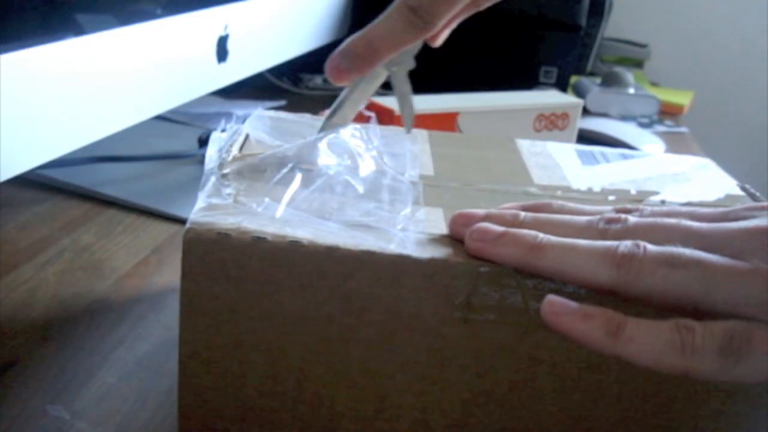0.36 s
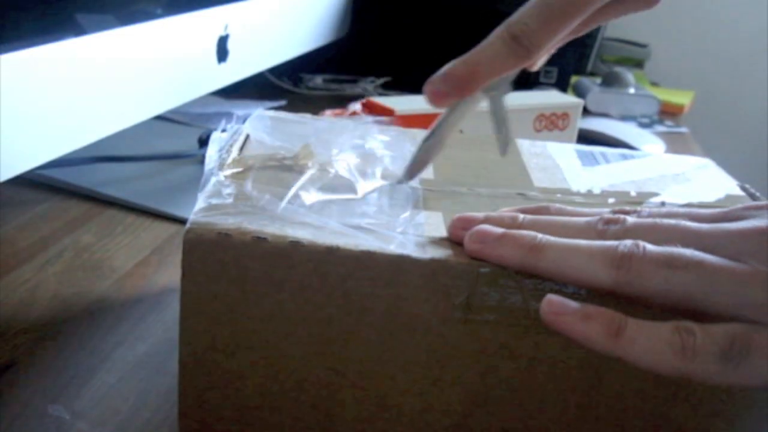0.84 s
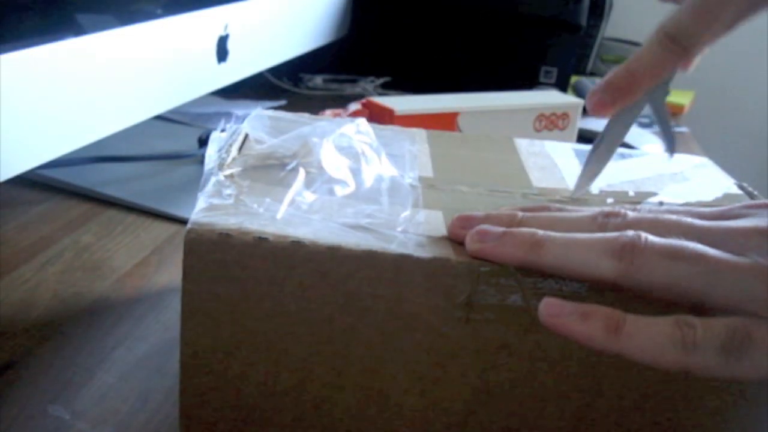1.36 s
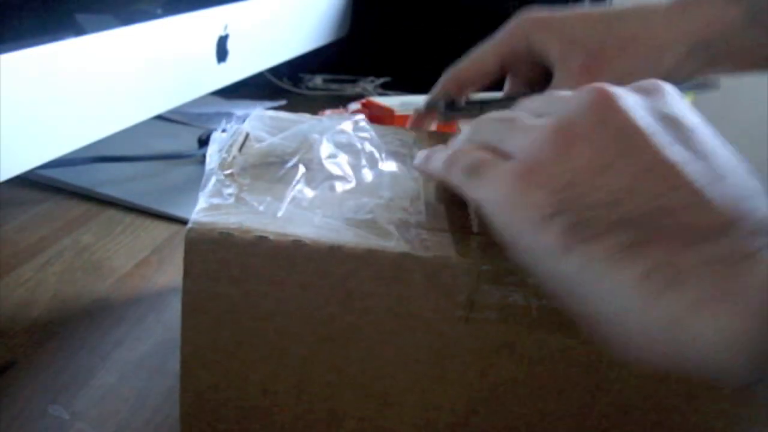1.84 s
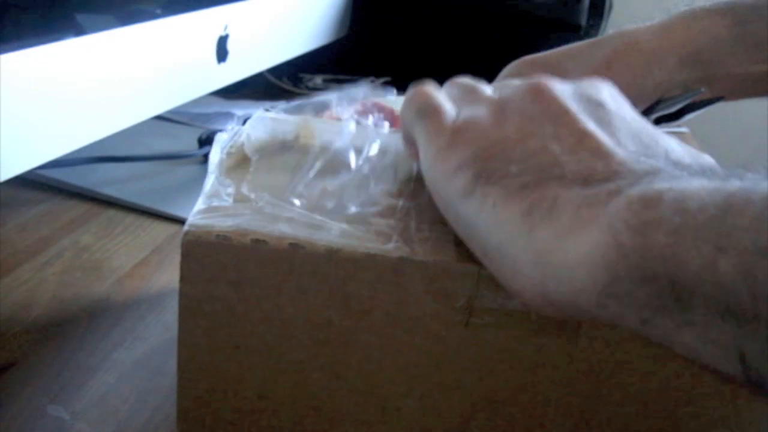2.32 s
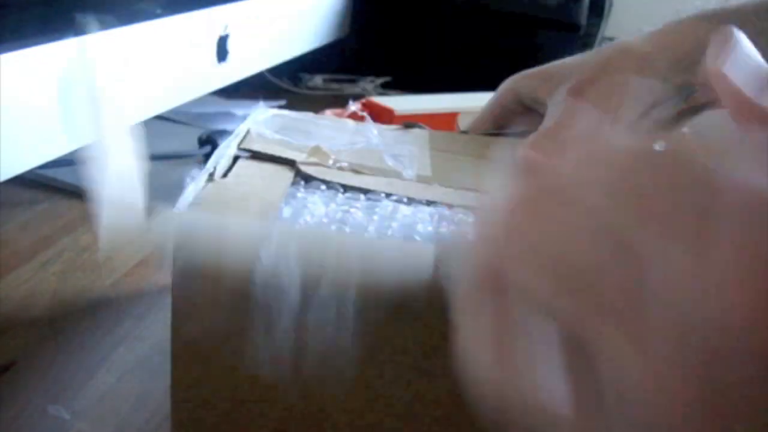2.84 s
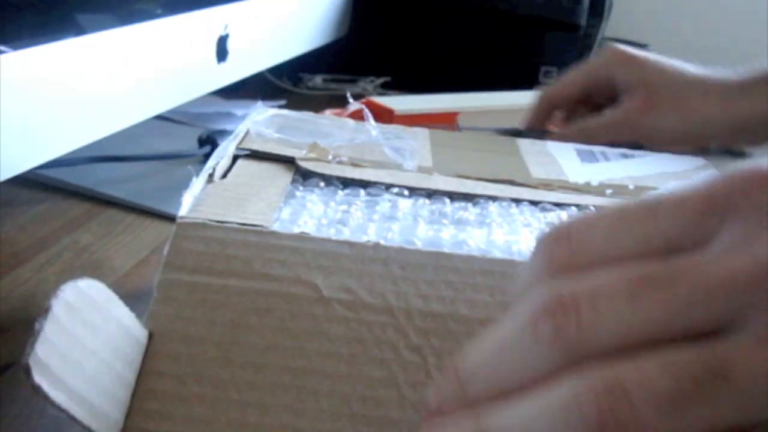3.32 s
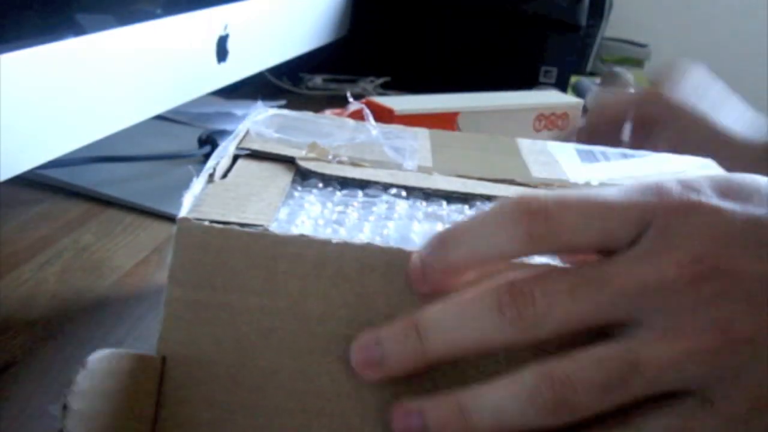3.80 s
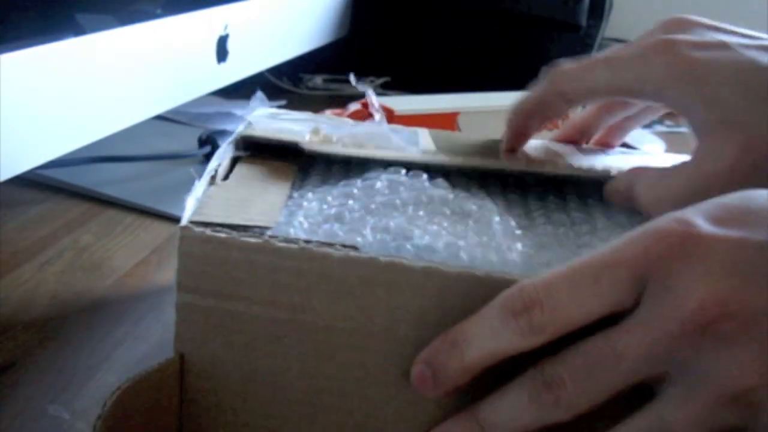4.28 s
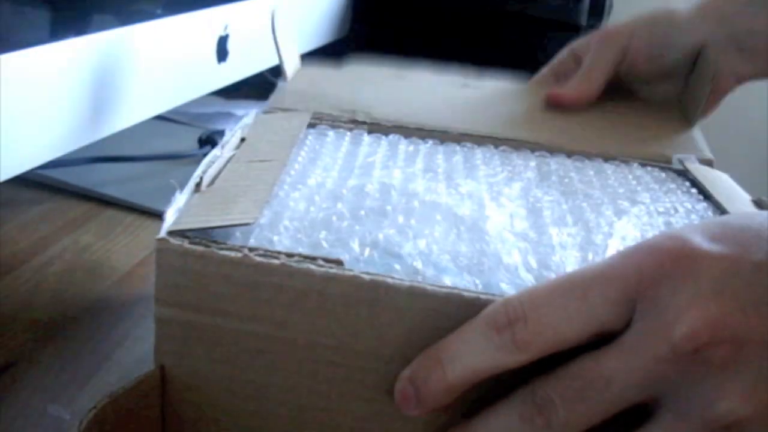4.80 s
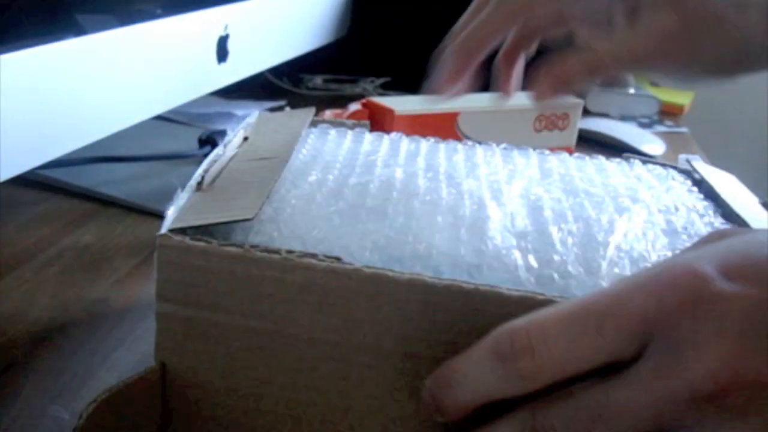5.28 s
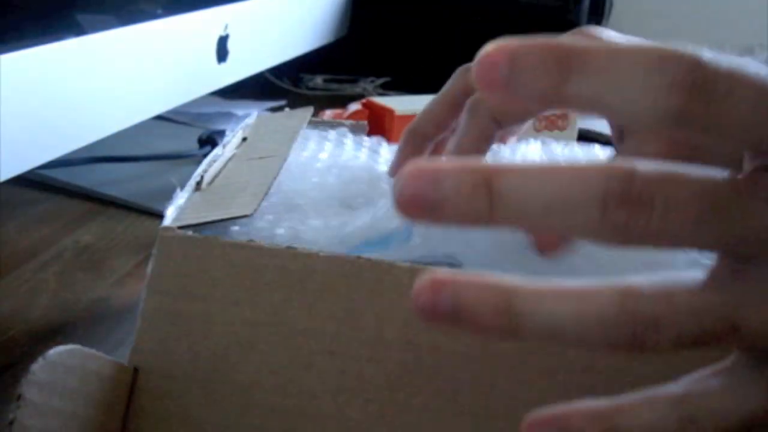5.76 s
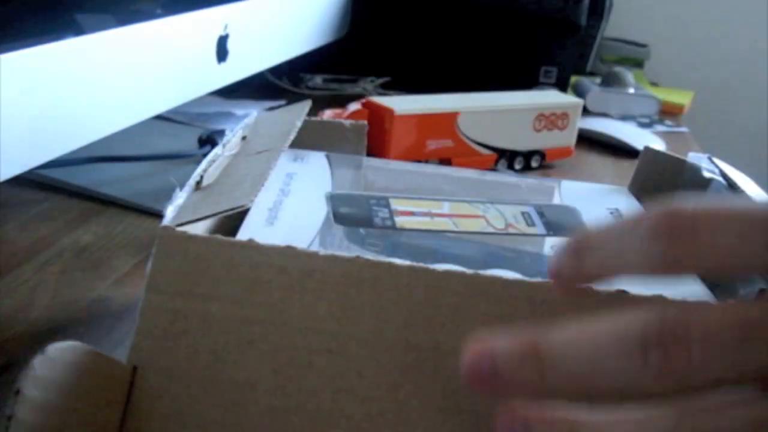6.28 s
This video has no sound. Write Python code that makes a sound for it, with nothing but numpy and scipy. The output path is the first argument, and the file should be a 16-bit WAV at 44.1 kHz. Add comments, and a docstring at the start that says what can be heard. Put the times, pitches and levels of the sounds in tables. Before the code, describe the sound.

Very close to a small mono microphone in a small dry room, a blade cuts tape on a cardboard box with jerky scrapes and sharp snaps. After a brief near-silence, hands tear and fold the flaps with crackles, hollow knocks, loud board pops and low desk thumps. Finally bubble wrap slides out with softer, smoother plastic rustling over faint steady hiss.

```python
"""Opening a taped cardboard box

A blade slits the tape close to a small mono microphone, hands fold the flaps back, bubble wrap is lifted out.
Slips (random clicks) and blows (a push and dying noise) drive resonances of box, flaps, tape and film;
bent panels sing as wavering tones, board pops as single pulses, the desk thumps.
A small room of feedback delays answers, over steady shaped hiss and a faint even tick inside the camera.
"""
import sys
import numpy as np
from scipy import signal
from scipy.fft import rfft, irfft, next_fast_len
from scipy.io import wavfile

SR = 44100
rng = np.random.default_rng(int(sys.argv[2]) if len(sys.argv) > 2 else 0)


def file_out(sig):
    """Save sig as 16-bit WAV at sys.argv[1]."""
    # one column per channel
    cols = np.atleast_2d(sig).T
    # limit, then scale
    lim = np.clip(cols, -1, 1)
    pcm = np.round(lim * 32767).astype(np.int16)
    wavfile.write(sys.argv[1], SR, pcm)


def boost_factor(decibels):
    """Convert a level in decibels to a linear amplitude factor."""
    exponent = np.asarray(decibels, float) / 20
    return 10 ** exponent


N = 292543


def rms_one(x):
    """Scale to unit rms."""
    return x / np.sqrt(np.mean(x ** 2) + 1e-20)


def in_time(rows):
    """Columns of a curve, sample by sample."""
    s, *columns = np.transpose(rows)
    return [np.interp(np.arange(N) / SR, s, c) for c in columns]


def drift(rate_hz):
    """Slow chance of rms 1: noise through a double one-pole low-pass."""
    r = np.exp(-2 * np.pi * rate_hz / SR)
    noise = rng.standard_normal(N + SR)
    return rms_one(signal.lfilter([1], [1, -2 * r, r * r], noise)[SR:])


WANDER_HZ = 12.4


def resonate(x, modes, wander_db=0):
    """Parallel modes of alternating sign, their drives wandering with the grip; white noise keeps its rms."""
    click = np.arange(SR) == 0
    out, answer = 0, 0
    for k, (hz, width_hz, level_db) in enumerate(modes):
        r = np.exp(-np.pi * width_hz / SR)
        zeros = (-1) ** k * boost_factor(level_db) * (1 - r * r) * np.array([1, 0, -1])
        poles = [1, -2 * r * np.cos(2 * np.pi * hz / SR), r * r]
        grip = rms_one(boost_factor(wander_db * drift(WANDER_HZ))) if np.any(wander_db) else 1
        out = out + signal.lfilter(zeros, poles, x * grip + 1e-18)
        answer = answer + signal.lfilter(zeros, poles, click + 1e-18)
    return out / np.sqrt(np.sum(answer ** 2))


def slips(per_s, spread_db, clump_db):
    """Stick-slip: random clicks of uneven size that come in clumps; rms 1."""
    sizes = boost_factor(spread_db * np.minimum(rng.exponential(1, N), 4)) * rng.choice([-1, 1], N)
    happens = rng.random(N) < per_s / SR
    return rms_one(sizes * happens * boost_factor(clump_db))


def rattles(s, levels_db, t60s, first_db, rattle_db=0):
    """Each blow is a one-sample push, then noise that dies away; t60 is held to 5 ms or more."""
    out, t = np.zeros(N), np.arange(SR // 2) / SR
    for at, level_db, t60 in zip(np.round(s * SR).astype(int), levels_db, t60s):
        shake = rng.standard_normal(len(t)) * boost_factor(-60 * t / np.clip(t60, .005, 1))
        shake[0] = boost_factor(first_db)
        out[at:at + len(t)] += boost_factor(level_db + rattle_db) * shake[:N - at]
    return out


GRIP_DB_PER_S, LET_GO_DB_PER_S = 6008, 598  # abrupt start, gentler stop


def rubs(rows):
    """Power of two bodies: each rub grips, slides from its first level to its last and lets go."""
    t, first, second = np.arange(N) / SR, np.zeros(N), np.zeros(N)
    for s, length, start_db, end_db, over_db in rows:
        end = s + max(length, 1 / 1000)
        span = slice(max(int(s * SR) - SR // 20, 0), int(end * SR) + SR // 4)
        level_db = np.interp(t[span], [s, end], [start_db, end_db])
        level_db -= GRIP_DB_PER_S * np.maximum(s - t[span], 0)
        level_db -= LET_GO_DB_PER_S * np.maximum(t[span] - end, 0)
        first[span] += boost_factor(2 * level_db)
        second[span] += boost_factor(2 * (level_db + over_db))
    return first, second


# resonances of each body: f/Hz, width/Hz, relative level/dB
BOX_MODES = [(135, 40, -13), (185, 30, -9), (285, 50, -4), (335, 40, -3), (385, 28, 1), (470, 50, -4)]
FLAP_MODES = [(578, 32, -1), (660, 40, -6), (711, 25, -2), (778, 30, 1), (865, 45, -3)]
CREASE_MODES = [(975, 105, -1.4), (1105, 73, 1.2), (1189, 88, -0.64), (1327, 50, 2), (1480, 60, -0.9)]
RIB_MODES = [(1626, 93, 1.5), (1832, 98, 0), (2028, 75, -0.5), (2245, 230, -4), (2665, 200, -4.5)]
TAPE_MODES = [(2285, 270, 3.2), (2388, 117, 9.4), (2580, 1050, 2.25), (3260, 210, 8.85), (3545, 820, 1.4)]
FILM_MODES = [(4490, 910, -5), (5455, 884, 0.5), (6100, 2440, -3.5), (7650, 890, -3), (10260, 800, -1)]
BLADE_MODES = [(2480, 140, 0)]
# stick-slip of box, flaps, creases, ribs, tape, film: rate/(1/s), size spread/dB, mode wander at 2 dB jerk/dB
BODY_SLIPS = [(800, 2.5, 2.4), (1100, 3.5, 2.4), (1800, 3, 2.1), (2600, 2.5, 1.6), (3000, 3, 2),
              (7000, 3.3, 2.6)]
# jerkiness of the hands, smooth once the wrap slides out: t/s, clumping/dB
HAND_JERK = [(0, 2), (1.9, 2), (5.5, 2), (5.65, .8), (6.63, .8)]
# blade singing along the seam: t/s, level/dB
BLADE_RASP = [(.2, -75), (.23, -34), (.275, -34), (.35, -37), (.38, -78.5)]
# blade and fingers on cardboard: t/s, length/s, box start level/dB, box end level/dB, flaps over box/dB
CARDBOARD_RUBS = [(0, 0.0036, -28, -39.5, -7), (.035, 0.041, -44, -26.5, -6.5),
                  (.131, 0.059, -30, -49, -18), (.207, 0.19, -36, -38, -5), (.41, 0.12, -45.5, -55.5, -8),
                  (.525, 0.097, -35.5, -36, -2.5), (.667, 0.064, -28, -34, -3.5), (.75, 0.079, -48, -58, 0),
                  (.824, 0.11, -43.5, -42, -1), (.916, 0.06, -41.5, -27.5, -3.5),
                  (.978, 0.089, -37.5, -27, -11), (1.064, 0.14, -38.5, -57, -3.5),
                  (1.19, 0.11, -45.5, -47, -6), (1.29, 0.026, -42.5, -28, -17),
                  (1.326, 0.22, -27.5, -63.5, -4.5), (1.58, 0.11, -55.5, -54, -18),
                  (1.71, 0.21, -57, -64, -8.5), (1.9, 0.044, -61, -43, -9), (1.955, 0.12, -39, -57, -9),
                  (2.083, 0.09, -44, -38, -5), (2.145, 0.13, -46, -47, -6), (2.256, 0.041, -22, -34, -23),
                  (2.302, 0.1, -43, -35.5, -9), (2.412, 0.11, -43, -50, 1), (2.51, 0.081, -48, -30, -9),
                  (2.576, 0.021, -22, -30, 0.5), (2.61, 0.15, -30, -57.5, -3.5),
                  (2.79, 0.049, -38, -46.5, -0.5), (2.863, 0.08, -50.5, -36.5, -2.5),
                  (2.963, 0.085, -46.5, -53.5, 2.5), (3.062, 0.083, -40.5, -48, -6.5),
                  (3.14, 0.13, -41.5, -69.5, -3.5), (3.55, 0.027, -56, -65, -3),
                  (3.598, 0.029, -31.5, -38, 5), (3.67, 0.012, -30, -28, 3.5), (3.725, 0.088, -29, -42, -2),
                  (3.816, 0.098, -25.5, -46.5, 3.5), (3.9, 0.15, -48.5, -45.5, 0),
                  (4.07, 0.21, -52.5, -48.5, -6.5), (4.25, 0.14, -50, -44.5, -2.5),
                  (4.372, 0.049, -36, -39, -2), (4.43, 0.12, -40, -38, -1.5), (4.54, 0.14, -44.5, -51, 2),
                  (4.659, 0.083, -31.5, -39, 0.5), (4.765, 0.11, -33, -54.5, 10),
                  (4.93, 0.04, -54, -46, 11), (4.972, .05, -41, -48, 8), (5.026, .02, -36, -40, 4),
                  (5.045, 0.12, -42, -49, 4), (5.158, 0.13, -40.5, -48.5, 7.5), (5.25, 0.18, -38, -48.5, 1),
                  (5.4, 0.077, -44, -45, -4), (5.47, 0.16, -67, -69, -2), (5.63, 0.21, -62, -49, 0.5),
                  (5.86, 0.18, -58.5, -56, 4.5), (6.046, 0.11, -56, -38.5, 1.5), (6.2, 0.056, -53, -61, -4),
                  (6.3, 0.12, -56, -53.5, -3.5), (6.5, 0.098, -61, -53, 5)]
# tape and wrap cut, pulled, crumpled: t/s, length/s, tape start level/dB, tape end level/dB, film over tape/dB
TAPE_FILM_RUBS = [(0, 0.015, -28, -50, -8), (.035, 0.039, -46, -25.5, -2.5), (.131, 0.071, -43, -50.5, -10),
                  (.207, 0.089, -36, -32, 2.5), (.3, 0.12, -38.5, -44, 7), (.405, 0.12, -42, -60.5, 0),
                  (.52, 0.09, -46, -34, 2), (.645, .02, -35.5, -34, -23), (.667, 0.054, -31, -27.5, -2.5),
                  (.72, 0.12, -39, -57.5, 1.5), (.824, 0.065, -44, -35, 0.5), (.916, 0.061, -44, -25.5, 1),
                  (.978, 0.088, -37, -26, -1), (1.07, 0.12, -31, -60.5, -0.5),
                  (1.19, 0.07, -45.5, -49.5, 0), (1.285, 0.027, -57, -31.5, -15),
                  (1.326, 0.24, -24, -71, -1), (1.618, 0.059, -74, -62, 11), (1.712, 0.23, -51.5, -73, -3),
                  (1.955, 0.058, -45, -39, 5.5), (2.012, 0.035, -46, -48.5, 9),
                  (2.084, 0.033, -36.5, -36.5, 2.5), (2.14, 0.11, -36.5, -50.5, -3),
                  (2.256, 0.019, -48, -40, -19), (2.302, 0.13, -38.5, -41, -11),
                  (2.412, 0.12, -42.5, -49, 0), (2.576, 0.021, -26, -24.5, -21),
                  (2.607, 0.11, -34.5, -59, 2), (2.74, 0.038, -58, -43, -9), (2.797, 0.044, -45, -38, -25),
                  (2.863, 0.086, -55, -36.5, -20), (2.963, 0.13, -50.5, -44, 2.5),
                  (3.062, 0.085, -39, -44, -6.5), (3.14, 0.045, -37.5, -51.5, 2.5),
                  (3.176, 0.13, -48, -69, 2), (3.54, 0.014, -53, -54, -4), (3.565, 0.033, -50, -49, -2),
                  (3.596, 0.052, -49, -49, 8), (3.67, 0.015, -40, -70, 7), (3.725, 0.13, -28.5, -47.5, -15),
                  (3.815, 0.019, -31, -44.5, -25), (3.84, 0.22, -43, -41.5, -5.5),
                  (4.066, 0.041, -43, -28.5, -2.5), (4.126, 0.073, -34.5, -47.5, -3),
                  (4.19, 0.048, -45.5, -43.5, -1), (4.25, .11, -35.5, -38.5, 1),
                  (4.37, 0.051, -28.5, -35, 1.5), (4.43, 0.1, -38, -31, -2), (4.54, 0.081, -36, -42.5, 4.5),
                  (4.653, 0.07, -28, -33, -4), (4.763, 0.086, -38.5, -36, 1), (4.86, 0.14, -49, -34, -4),
                  (5.045, 0.062, -44, -43.5, -26), (5.156, 0.22, -42, -47, -4.5),
                  (5.4, 0.058, -40.5, -29.5, -33), (5.46, 0.048, -47, -50.5, 10),
                  (5.52, 0.11, -50, -52, 7.5), (5.63, 0.1, -49, -39, 5), (5.73, 0.088, -38.5, -36, 4.5),
                  (5.82, 0.08, -36, -40, 4), (5.905, 0.138, -37.5, -33, 3.5),
                  (6.046, 0.13, -33, -30.5, 3.5), (6.2, 0.37, -45.5, -46.5, 3.5),
                  (6.55, 0.067, -50.5, -45, 4)]
# fingers along a fold: t/s, length/s, creases start level/dB, creases end level/dB, ribs over creases/dB
CREASE_RUBS = [(.035, 0.022, -35, -44, 5), (2.089, 0.09, -51, -41, -5), (2.576, 0.022, -27, -30, 0.5),
               (2.8, 0.033, -45, -54, -12), (3.598, 0.033, -39, -55, -20), (3.669, 0.029, -36, -47, -27),
               (3.73, 0.04, -31, -47, 4), (3.816, 0.031, -20, -30.5, 1), (3.88, .17, -50, -54, 10),
               (4.372, 0.054, -27, -35, -3), (4.765, 0.043, -30, -34, -3), (5.04, 0.066, -31, -35, -7),
               (5.27, 0.048, -34, -42, -6), (6.51, 0.097, -46, -44, -21), (6.62, 0.0092, -41, -22.5, -18)]
# creases and ribs work along with every rub
CREASES_FROM_BOX_DB, CREASES_FROM_FLAPS_DB, CREASES_FROM_TAPE_DB = -4, -7.5, -11.5
RIBS_FROM_BOX_DB, RIBS_FROM_FLAPS_DB, RIBS_FROM_TAPE_DB = -11.5, -15.5, -8
# dry ticks, level at 2 dB jerk
SCRATCHES_PER_S, SCRATCH_FROM_TAPE_DB, SCRATCH_LOW_HZ, SCRATCH_HIGH_HZ = 450, -8.5, 900, 6000


def handling():
    """Slips under blade and fingers shake every body; all feel the hand's jerks, each also flutters alone."""
    jerk_db = in_time(HAND_JERK)[0]
    clumps_db = jerk_db * (0.64 * drift(23) + drift(190))
    out = resonate(boost_factor(in_time(BLADE_RASP)[0]) * slips(3000, 1.8, clumps_db), BLADE_MODES)

    box, flaps = rubs(CARDBOARD_RUBS)
    tape, film = rubs(TAPE_FILM_RUBS)
    creases, ribs = rubs(CREASE_RUBS)
    creases = (creases + box * boost_factor(2 * CREASES_FROM_BOX_DB) + flaps * boost_factor(2 * CREASES_FROM_FLAPS_DB)
               + tape * boost_factor(2 * CREASES_FROM_TAPE_DB))
    ribs = (ribs + box * boost_factor(2 * RIBS_FROM_BOX_DB) + flaps * boost_factor(2 * RIBS_FROM_FLAPS_DB)
            + tape * boost_factor(2 * RIBS_FROM_TAPE_DB))

    bodies = [(BOX_MODES, box), (FLAP_MODES, flaps), (CREASE_MODES, creases),
              (RIB_MODES, ribs), (TAPE_MODES, tape), (FILM_MODES, film)]
    for (modes, power), (per_s, spread_db, wander_db) in zip(bodies, BODY_SLIPS):
        flutter_db = 0.56 * jerk_db * drift(41)
        drive = np.sqrt(power) * slips(per_s, spread_db, clumps_db + flutter_db)
        out = out + resonate(drive, modes, wander_db * jerk_db / 2)

    band = signal.butter(2, [SCRATCH_LOW_HZ, SCRATCH_HIGH_HZ], "band", fs=SR, output="sos")
    scratches = rms_one(signal.sosfilt(band, slips(SCRATCHES_PER_S, 2.5, clumps_db) + 1e-18))
    return out + boost_factor(SCRATCH_FROM_TAPE_DB) * np.sqrt(tape) * (jerk_db / 2) ** 2 * scratches


CRACK_LOW_CUT_HZ = 690


def cracks(s, level_db):
    """The sharp front of a snap: one short pull and push, its lows cut."""
    u = np.arange(-SR // 1000, SR // 1000 + 1) / SR / 0.0001  # time in units of 0.1 ms
    pulse = u * np.exp(-u * u / 2)
    clicks = np.zeros(N)
    clicks[np.round(s * SR).astype(int)] = boost_factor(level_db)
    thin = signal.butter(2, CRACK_LOW_CUT_HZ, "high", fs=SR, output="sos")
    return signal.sosfilt(thin, signal.fftconvolve(clicks, pulse / np.max(pulse), "same") + 1e-18)


# snaps of tape and film: t/s, crack level before low cut/dB, tape drive/dB, film drive/dB, base t60/s
TAPE_FILM_SNAPS = [(0.035, -9.5, -26, -23.5, 0.049), (0.13, -10, -12.5, -23, 0.013),
                   (0.206, -23, -37, -39, 0.031), (0.404, -25, -30, -32, 0.066),
                   (0.519, -30, -31, -28.5, 0.023), (0.541, -18, -28, -26, 0.037),
                   (0.566, -21, -30, -24, 0.024), (0.58, -24, -32, -28, 0.03), (0.597, -31, -28, -27, 0.04),
                   (0.642, -35, -34, -18, 0.016), (0.664, -21, -25, -23, 0.068),
                   (0.674, -14, -24, -19.5, 0.036), (0.701, -31, -25, -20, 0.043),
                   (0.822, -31, -42, -35, 0.11), (0.983, -28, -15, -33, 0.04),
                   (1.001, -27, -32, -27, 0.018), (1.025, -22, -10.5, -22.5, 0.13),
                   (1.058, -23, -20, -27, 0.061), (1.293, -31, -38, -31, 0.084),
                   (1.314, -16, -22, -39, 0.05), (1.323, -20, -32, -31, 0.069),
                   (1.466, -41, -45, -40, 0.061), (1.62, -44, -62, -31.5, 0.059),
                   (1.953, -23, -16.5, -25, 0.069), (1.984, -22, -35, -19, 0.047),
                   (2.013, -23, -38, -25, 0.04), (2.09, -26, -19, -17, 0.016),
                   (2.218, -23.5, -39, -34, 0.018), (2.256, -8, -38, -31, 0.083),
                   (2.305, -21, -23, -23, 0.048), (2.358, -31, -26, -25, 0.0097),
                   (2.385, -16.5, -33, -26.5, 0.16), (2.484, -30, -50, -27.5, 0.022),
                   (2.574, -9.5, -33, -20.5, 0.14), (2.739, -33, -29, -45, 0.046),
                   (2.797, -12.5, -13.5, -22, 0.018), (2.874, -38, -39, -36, 0.098),
                   (2.914, -42, -42, -27.5, 0.032), (2.928, -39, -28, -29, 0.04),
                   (2.945, -29, -23.5, -23.5, 0.044), (3.068, -15.5, -19.5, -40, 0.056),
                   (3.14, -28, -14.5, -29, 0.035), (3.275, -39, -43, -64, 0.048),
                   (3.539, -47, -28.5, -24.5, 0.033), (3.593, -37, -35, -23, 0.09),
                   (3.669, -25, -40, -34, 0.022), (3.7239, -7, -14, -18.5, 0.06),
                   (3.733, -22, -9, -35, 0.034), (3.8146, -6, -28, -43, 0.034),
                   (4.053, -37, -37, -24, 0.024), (4.093, -28, -34, -28, 0.04),
                   (4.118, -24, -12.5, -24, 0.11), (4.144, -17, -21, -42, 0.03),
                   (4.248, -32, -23, -47, 0.05), (4.267, -25, -40, -24, 0.031),
                   (4.373, -31, -35, -32, 0.037), (4.458, -18, -41, -50, 0.044),
                   (4.515, -28, -30, -23, 0.042), (4.659, -30, -6.5, -29, 0.072),
                   (4.762, -28, -39, -23.5, 0.023), (4.833, -15.5, -30, -19, 0.065),
                   (4.843, -22, -33, -42, 0.041), (5.03, -21, -25, -31.5, 0.09),
                   (5.069, -13, -24, -35.5, 0.12), (5.154, -23, -38, -51, 0.041),
                   (5.261, -28, -50, -26, 0.17), (5.399, -25, -34, -13.5, 0.016),
                   (5.407, -40, -22, -18.5, 0.021), (5.439, -13.5, -38, -26.5, 0.22),
                   (6.047, -30, -26, -17.5, 0.031), (6.079, -25, -30, -30, 0.025),
                   (6.148, -23, -28, -28, 0.017), (6.16, -23, -36, -36, 0.022), (6.41, -28, -44, -34, 0.06)]


def snaps():
    """A snap is a crack, then tape and film crackle briefly, each for its share of the base t60."""
    s, crack_db, tape_db, film_db, t60 = np.transpose(TAPE_FILM_SNAPS)
    tape = resonate(rattles(s, tape_db, 0.038 * t60, first_db=-3.5), TAPE_MODES)
    film = resonate(rattles(s, film_db, 0.66 * t60, first_db=8.5), FILM_MODES)
    return cracks(s, crack_db) + tape + film


SPOT_LONGEST_T60_S = 0.04


def struck_spots(s, level_db, spot_hz, t60_s, cycles):
    """The spot that is hit rings at its own pitch and keeps shivering while the blow rattles."""
    out, t = np.zeros(N), np.arange(SR // 4) / SR
    for at, db, hz in zip(np.round(s * SR).astype(int), level_db, spot_hz):
        shake = rng.standard_normal(len(t)) * boost_factor(-29.5 - 60 * t / t60_s)
        shake[0] = 1
        ring_t60_s = min(cycles / hz, SPOT_LONGEST_T60_S)
        r, w = boost_factor(-60 / (ring_t60_s * SR)), 2 * np.pi * hz / SR
        ring = signal.lfilter([.5, 0, -.5], [1, -2 * r * np.cos(w), r * r], shake)
        out[at:at + len(t)] += boost_factor(db) * ring[:N - at]
    return out


# cardboard knocks: t/s, struck spot level/dB, spot f/Hz, box drive/dB, flaps drive/dB
CARDBOARD_KNOCKS = [(0.034, -14.5, 1580, -22.5, -28), (0.1325, -19, 343, -25, -40),
                    (0.54, -42, 410, -44, -48), (0.669, -19, 436, -37, -37), (0.822, -34, 526, -51, -34),
                    (1.025, -16, 489, -39, -26), (1.326, -13, 1170, -45, -22), (1.614, -30, 389, -40, -40),
                    (1.643, -33.5, 300, -45, -34), (1.717, -37.5, 1080, -54, -64),
                    (1.952, -39, 2080, -50, -28), (2.011, -35, 376, -56, -30),
                    (2.089, -16, 1120, -20.5, -24), (2.148, -21, 265, -23, -42),
                    (2.171, -23, 1100, -43, -35), (2.254, -14, 358, -36, -34), (2.268, -36, 350, -24, -36),
                    (2.307, -27, 520, -22, -28), (2.36, -25, 497, -39, -36),
                    (2.383, -22.5, 520, -22.5, -30), (2.576, -14, 340, -17, -13),
                    (2.605, -12.5, 391, -19, -23), (2.795, -14, 246, -36, -31),
                    (2.872, -22, 2380, -51, -63), (3.062, -25, 1650, -34, -42),
                    (3.275, -48, 1200, -71, -61), (3.596, -23, 388, -43, -20), (3.669, -35, 1070, -34, -16),
                    (3.678, -30, 1020, -25, -15), (3.694, -36, 885, -24, -14.5),
                    (3.724, -9, 2030, -26, -27), (3.817, -7, 783, -17.5, -3.5),
                    (4.117, -13.5, 2750, -44, -34), (4.367, -16.5, 297, -48, -22),
                    (4.515, -15.5, 2260, -48, -49), (4.658, -17.5, 300, -33, -16),
                    (4.685, -19, 324, -35, -37), (4.763, -17, 1490, -33, -21), (4.781, -25, 830, -36, -35),
                    (4.808, -28, 776, -42, -36), (4.889, -19, 570, -60, -26), (4.973, -32, 840, -38, -16),
                    (5.027, -23, 580, -15, -20), (5.066, -24, 785, -31, -37), (5.168, -22, 780, -23.5, -47),
                    (5.269, -41, 587, -40, -25), (5.519, -30, 454, -65, -55), (6.046, -34, 346, -60, -24.5),
                    (6.062, -36, 357, -45, -41), (6.108, -25, 2820, -51, -24), (6.436, -27, 429, -43, -35)]
# wall resonance: f/Hz, width/Hz, relative level/dB
WALL_MODES = [(306, 82, 0)]
SPOT_SHIVER_T60_S = 0.15


def knocks():
    """A knock sounds at the struck spot, dents the wall and rings box, flaps and creases."""
    s, spot_db, spot_hz, box_db, flap_db = np.transpose(CARDBOARD_KNOCKS)
    t60 = np.full(len(s), SPOT_SHIVER_T60_S)
    short = 0.033 * t60
    spot = struck_spots(s, spot_db, spot_hz, SPOT_SHIVER_T60_S, cycles=21.4)
    wall = resonate(rattles(s, box_db, short, first_db=9.0), WALL_MODES)
    box = resonate(rattles(s, box_db, short, first_db=7.5), BOX_MODES)
    flaps = resonate(rattles(s, flap_db, short, first_db=-2.5), FLAP_MODES)
    creases = resonate(rattles(s, flap_db, 0.38 * t60, first_db=4.0, rattle_db=-11.5), CREASE_MODES)
    return spot + wall + box + flaps + creases


# stiff board popping over a fold: t/s, peak level/dB, centre f/Hz
BOARD_POPS = [(2.089, -20, 1070), (2.2545, -11, 480), (2.26, -13, 413), (2.797, -16.5, 480),
              (2.8, -26, 476), (3.598, -11, 670), (3.603, -15, 680), (3.67, -10.5, 1140), (3.6728, -6, 865),
              (3.678, -8, 890), (3.695, -11, 890), (3.821, -15, 1100), (3.825, -14, 900), (4.37, -21, 900),
              (4.378, -23, 1090), (4.763, -1, 1190), (4.889, -37, 690), (5.168, -30, 800)]


def pops():
    """A dull single pull and push, the longer the lower its centre."""
    half = SR // 200
    out, t = np.zeros(N), np.arange(-half, half + 1) / SR
    for s, peak_db, hz in BOARD_POPS:
        u, at = t * 2 * np.pi * hz, round(s * SR)
        out[at - half:at + half + 1] += boost_factor(peak_db) * u * np.exp((1 - u * u) / 2)
    return out


# one panel singing on its own pitch while bent: t/s, length/s, f/Hz, start level/dB, end level/dB
PANEL_SINGS = [(.07, 0.016, 440, -27, -40), (0.073, 0.017, 1520, -29, -32), (.135, 0.034, 174, -30, -41),
               (0.27, 0.0073, 953, -32, -37), (0.667, 0.017, 2050, -21, -33), (.858, .012, 4400, -34, -42),
               (2.262, 0.026, 371, -22, -34), (2.255, 0.019, 884, -29, -41), (2.39, .025, 1855, -32, -38),
               (2.579, 0.015, 382, -22, -28), (2.602, .008, 385, -19, -24), (2.645, 0.1, 386.4, -32, -49),
               (2.801, 0.034, 1400, -32, -46), (3.071, .04, 1930, -39, -46), (3.6, 0.04, 388, -24.5, -29.5),
               (3.602, 0.049, 1320, -39, -44), (3.673, 0.042, 385.3, -20, -33),
               (3.671, 0.071, 706, -19.5, -29), (3.671, 0.04, 580, -25, -34), (3.663, .045, 1310, -35, -28),
               (3.67, 0.021, 1010, -29, -38), (3.727, 0.04, 2245, -24, -32.5),
               (3.826, 0.023, 576, -13.5, -39), (3.821, .04, 759, -21, -34), (3.821, 0.02, 850, -22, -37),
               (3.821, 0.034, 1210, -40, -32), (3.819, 0.022, 2540, -22, -39),
               (4.113, .015, 3060, -26, -37), (4.264, 0.035, 319, -39, -46), (4.368, 0.016, 291, -29, -42),
               (4.369, 0.011, 1117, -20, -40), (4.503, 0.016, 2290, -26.5, -32),
               (4.657, 0.024, 309, -21.5, -31), (4.77, 0.022, 772, -14.5, -32),
               (4.77, 0.026, 568, -29, -38), (4.805, 0.009, 793, -25, -38), (4.891, .02, 567, -32, -39),
               (4.975, 0.052, 783, -27, -33), (4.975, 0.023, 583, -34, -36), (4.965, .015, 1025, -30, -33),
               (5.028, .02, 577, -32, -34.5), (5.03, 0.02, 325, -30, -46), (5.033, 0.015, 1480, -22, -49),
               (5.066, 0.011, 1870, -23.5, -34), (5.164, 0.028, 775, -25, -38),
               (5.166, .035, 582, -30, -44), (5.202, 0.045, 324, -36.5, -39),
               (6.042, 0.057, 357.3, -35, -40.5), (6.081, 0.1, 2780, -47, -32.5),
               (6.134, 0.063, 353.6, -36.5, -41), (6.311, 0.044, 419, -49, -51),
               (6.436, 0.031, 429, -39, -50), (6.53, 0.065, 1260, -50, -51)]
SING_WIDTH_SHARE = 0.089  # bandwidth over pitch
SING_TONE_SHARE = 0.71  # steady part of the power
SING_WAVER_MS, SING_WAVER_HZ = 0.31, 29.5  # rms timing wander and its rate


def singing():
    """A wavering tone on the panel's pitch, with slips ringing through a narrow resonance applied twice."""
    rough = slips(2500, 1.2, 0)
    waver_s = SING_WAVER_MS / 1000 * drift(SING_WAVER_HZ)
    out = 0
    for s, length, hz, start_db, end_db in PANEL_SINGS:
        width_hz = SING_WIDTH_SHARE * hz
        mode = [(hz, width_hz, 0)]
        level = np.sqrt(rubs([(s, length, start_db, end_db, 0)])[0])
        tone = level * np.sin(2 * np.pi * hz * (np.arange(N) / SR - s + waver_s))
        shiver = resonate(resonate(level * rough, mode), mode) * np.sqrt(np.pi * width_hz / SR)
        out = out + np.sqrt(2 * SING_TONE_SHARE) * tone + np.sqrt(1 - SING_TONE_SHARE) * shiver
    return out


# box thumping on the desk: t/s, drive/dB
DESK_THUMPS = [(0.114, -19.5), (0.129, -21), (0.539, -27), (0.665, -46), (0.979, -40), (1.019, -43),
               (1.322, -38), (2.15, -26.5), (2.253, -26), (2.576, -27.5), (2.795, -32.5), (3.594, -23),
               (3.669, -31), (3.816, -35), (4.366, -44), (4.657, -25.5), (4.764, -38), (5.026, -32)]
# desk resonances: f/Hz, width/Hz, relative level/dB
DESK_MODES = [(40, 60, -16), (137, 24, 0), (185, 26, -2)]


def thumps():
    """Blows excite low modes of the desk under the box."""
    s, drive_db = np.transpose(DESK_THUMPS)
    t60 = np.full(len(s), .08)
    return resonate(rattles(s, drive_db, t60, first_db=29.5, rattle_db=-10.5), DESK_MODES)


ROOM_LOW_T60_S, ROOM_DB, WALL_CUT_HZ = 0.11, -14.5, 1400  # t60 holds for the lows


def room(x):
    """Ten feedback delays, duller on every round, on a padded frequency grid."""
    size = next_fast_len(N + SR)
    w = 2 * np.pi * np.arange(size // 2 + 1) / size
    dull = 1 / (1 + 1j * w * SR / (2 * np.pi * WALL_CUT_HZ))
    answer = 0
    for k, lag in enumerate(rng.uniform(0.0074, 0.032, size=10) * SR):
        trip = boost_factor(-60 * lag / SR / ROOM_LOW_T60_S) * dull * np.exp(-1j * w * lag)
        answer = answer + (-1) ** k * trip / (1 - trip)
    return irfft(rfft(x, size) * answer, size)[:N]


# hiss spectrum: f/Hz, relative density/dB
HISS_SPECTRUM = [(18, -15), (30, -6), (284, -1), (754, -8), (1230, -6), (3520, -10), (5870, -11),
                 (9570, -10), (10300, -17), (13400, -47), (22000, -120)]
HISS_RMS_DB = -58.5


def hiss():
    """Steady room and microphone noise: white noise shaped over log frequency."""
    hz, level_db = np.transpose(HISS_SPECTRUM)
    log_hz = np.log(np.arange(1, N // 2 + 2) * SR / N)
    shape = boost_factor(np.interp(log_hz, np.log(hz), level_db))
    return boost_factor(HISS_RMS_DB) * rms_one(irfft(rfft(rng.standard_normal(N)) * shape, N))


# faint ticking: t/s, level/dB
TICK_LEVEL = [(3.22, -91), (3.27, -73), (3.42, -64), (3.51, -61), (3.53, -91)]
TICKS_PER_S, TICK_HZ, TICK_WIDTH_HZ = 60, 4600, 500


def ticking():
    """Even clicks into one short resonance, applied twice."""
    clicks = np.diff(np.floor(np.arange(N + 1) * TICKS_PER_S / SR + .7))
    mode = [(TICK_HZ, TICK_WIDTH_HZ, 0)]
    return boost_factor(in_time(TICK_LEVEL)[0]) * rms_one(resonate(resonate(clicks, mode), mode))


def scene():
    """One microphone feeds both channels."""
    near = handling() + snaps() + knocks() + pops() + singing() + thumps()
    mono = near + boost_factor(ROOM_DB) * room(near) + hiss() + ticking()
    return np.tile(mono, (2, 1))


def top_cut(x):
    """Nothing passes above the cut-off."""
    return signal.sosfilt(signal.butter(12, 11040, fs=SR, output="sos"), x)


def record(dry):
    """Weak bass, rounded peaks, a steep cut at the top."""
    thin = signal.sosfilt(signal.butter(2, 60, "high", fs=SR, output="sos"), dry)
    rounded = .9 * np.tanh(thin / .9)
    steep = signal.cheby2(16, 60, 10454.5, fs=SR, output="sos")  # 60 dB down from 10454.5 Hz
    return top_cut(signal.sosfilt(steep, rounded))


dry = scene()
out = record(dry)
file_out(out)
```